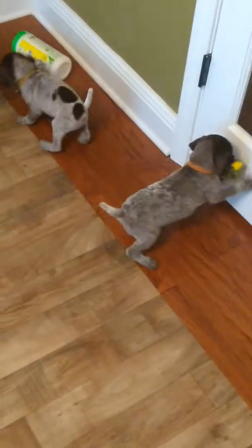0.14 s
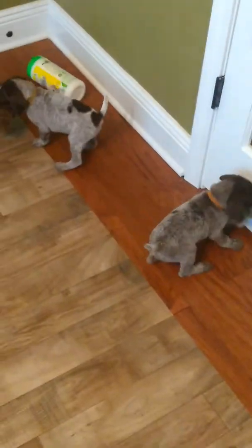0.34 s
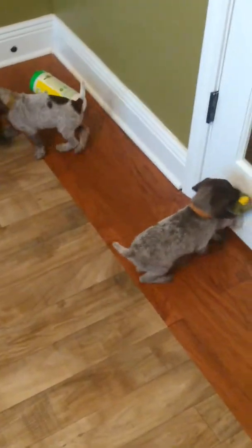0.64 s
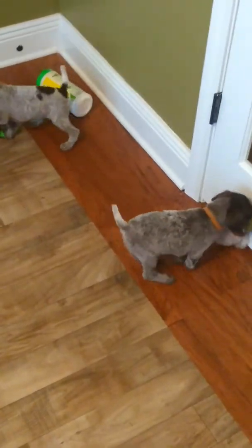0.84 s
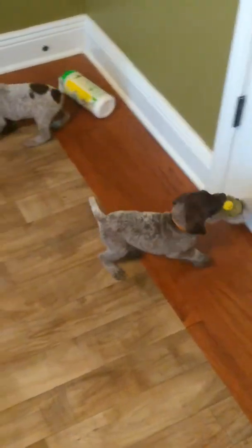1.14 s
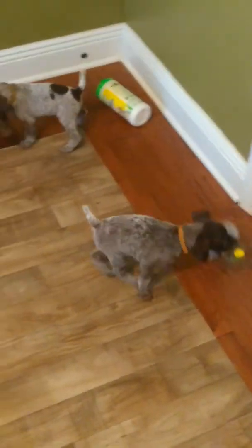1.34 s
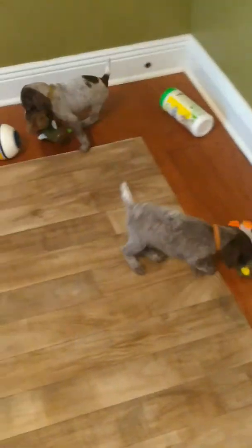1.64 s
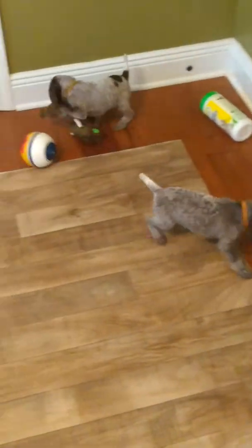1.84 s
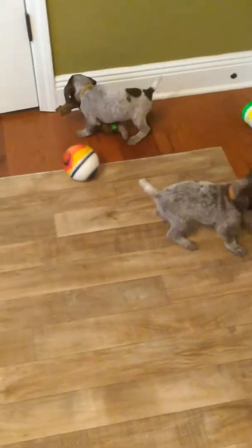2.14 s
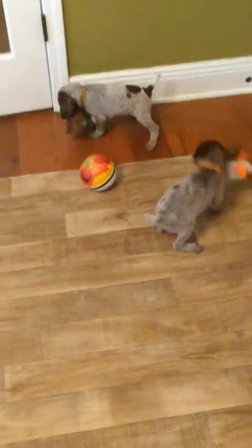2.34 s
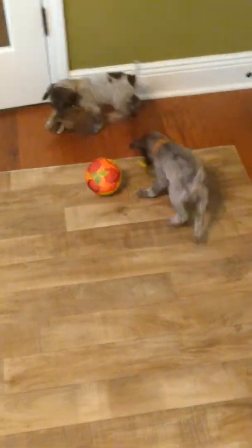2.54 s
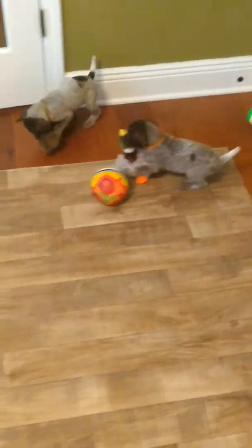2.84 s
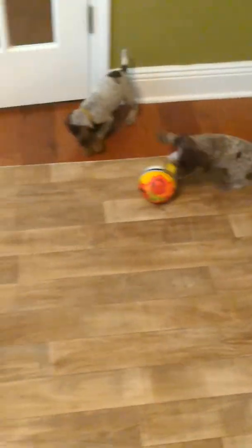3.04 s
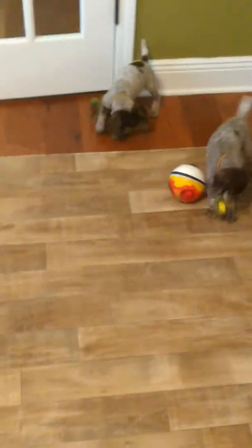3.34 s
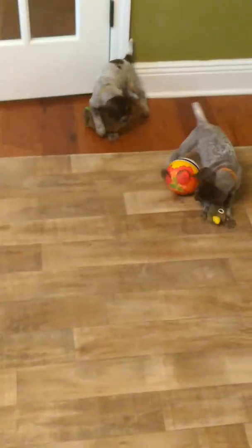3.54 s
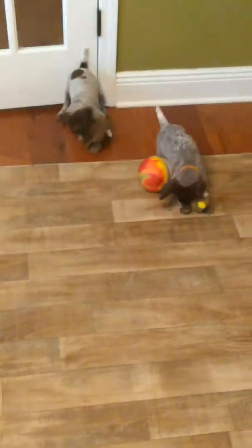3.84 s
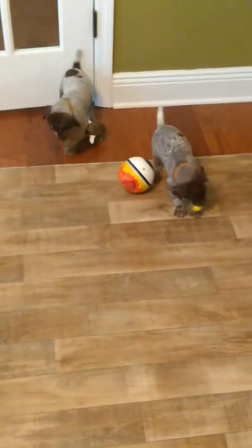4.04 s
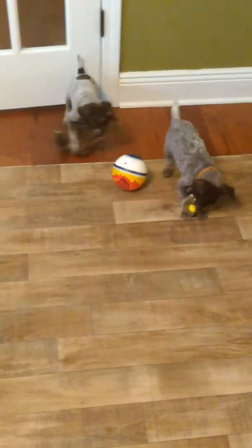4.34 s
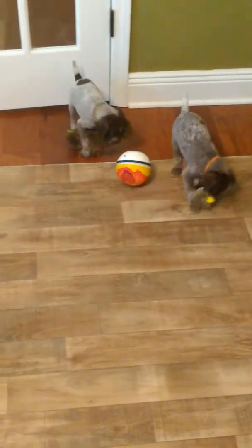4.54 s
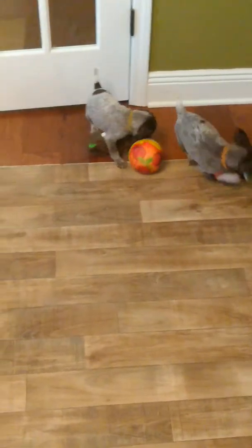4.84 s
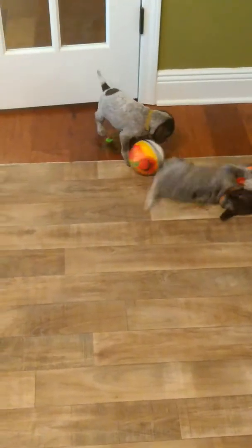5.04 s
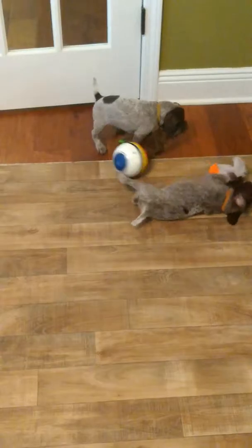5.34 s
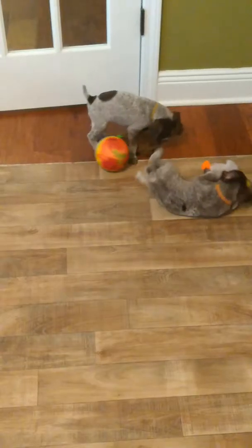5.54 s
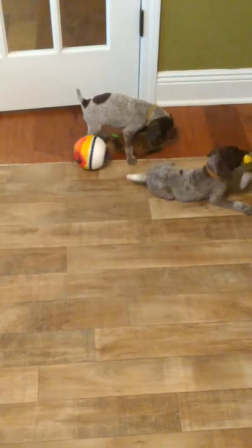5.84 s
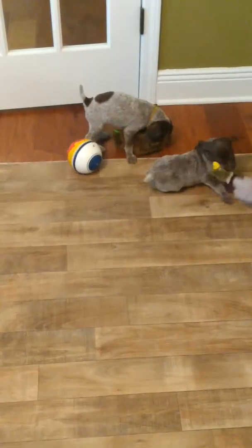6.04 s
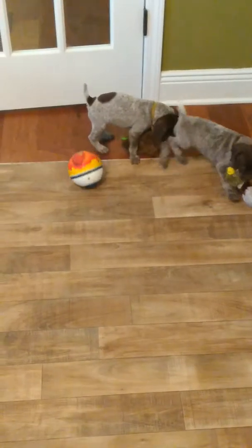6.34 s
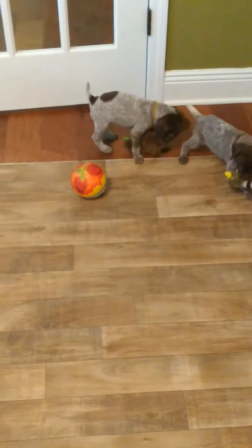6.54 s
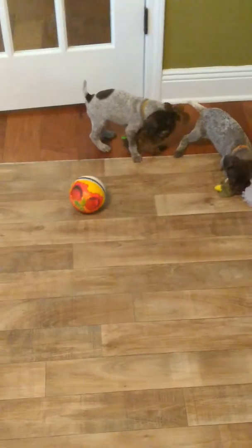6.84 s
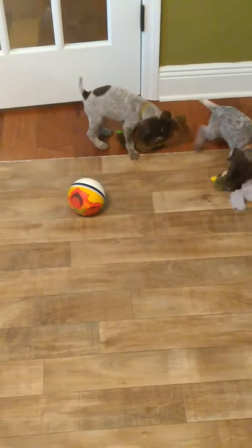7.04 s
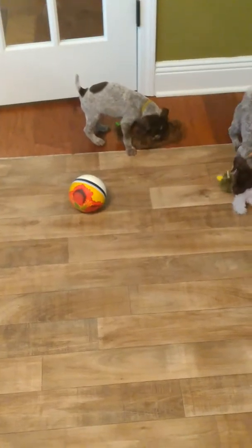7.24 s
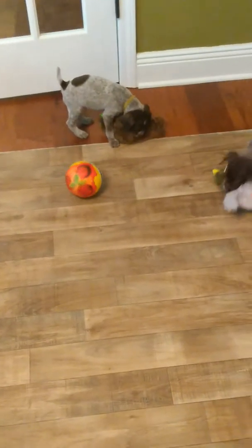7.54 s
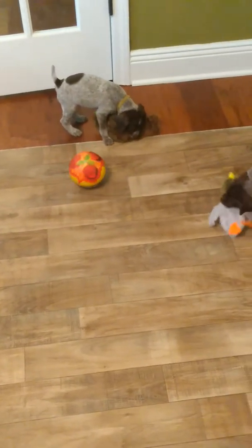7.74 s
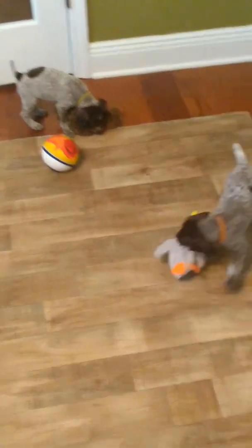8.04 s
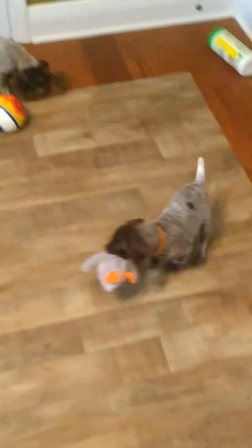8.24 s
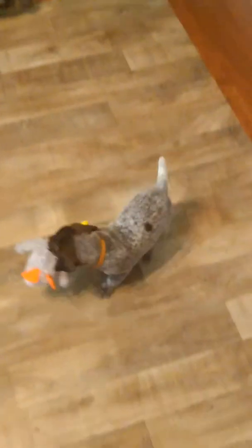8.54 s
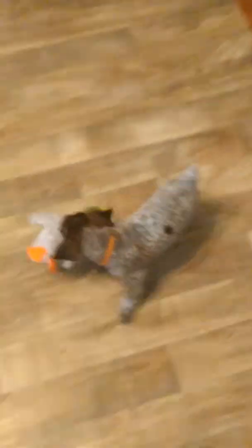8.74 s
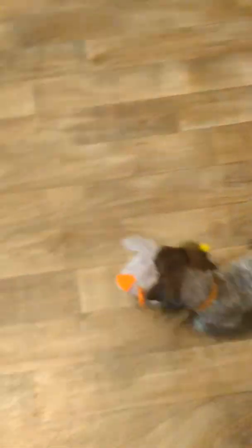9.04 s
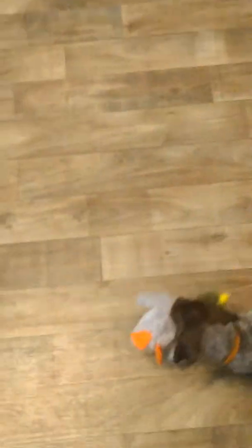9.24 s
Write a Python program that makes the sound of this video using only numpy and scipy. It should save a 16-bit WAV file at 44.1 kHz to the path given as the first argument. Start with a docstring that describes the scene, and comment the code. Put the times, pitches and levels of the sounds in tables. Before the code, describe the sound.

Puppies scamper over a hard floor in a bare, slightly echoing room. Claws click unevenly, paws thud lightly and fur and toys scuff along the boards. A small sharp snap comes near the start, and one louder knock lands about halfway. The patter thins briefly, then gets busy again. A faint ventilation hum runs underneath, all heard from a phone at standing height.

```python
"""Two puppies scamper with their toys over the hard floor of a bare room. From the start feet and fur
scuff, claws tick and pads thud on the boards over a ventilation hum; something small snaps at 0.3 s.
Landings crowd together at 2-3 s, lighten near 4 s, and the heaviest falls at 5.15 s. After a sparser
stretch the scamper is busy again from 7.4 s to the end at 9.4 s.
A phone with a front and a back microphone port listens from standing height."""
import sys
import numpy as np
from scipy import signal
from scipy.fft import rfft, irfft, next_fast_len
from scipy.io import wavfile

SR = 44100
rng = np.random.default_rng(int(sys.argv[2]) if len(sys.argv) > 2 else 0)


def int16_out(signal):
    """Quantize to a 16-bit WAV file."""
    q = np.round(np.clip(np.atleast_2d(signal).T, -1, 1) * 32767)
    wavfile.write(sys.argv[1], SR, q.astype(np.int16))


N = 414143
N_FFT = next_fast_len(N + SR)
BIN_HZ = np.maximum(np.arange(N_FFT // 2 + 1) * SR / N_FFT, 1)


def from_db(db):
    return 10 ** (np.asarray(db) / 20)


def unit_rms(x):
    return x / np.sqrt(np.mean(x ** 2) + 1e-20)


def at_hz(curve, hz):
    freq_hz, values = np.transpose(curve)
    return np.interp(np.log(hz), np.log(freq_hz), values)


def coloured(x, spectrum):
    """Noise shaped by a spectrum; rms 1."""
    shaped = rfft(x, N_FFT) * from_db(at_hz(spectrum, BIN_HZ))
    return unit_rms(irfft(shaped, N_FFT)[..., :N])


def ring(x, hz, t60_s):
    """Resonator: a unit click starts a decaying sine of height 1."""
    radius, angle = from_db(-60 / (t60_s * SR)), 2 * np.pi * hz / SR
    return signal.lfilter([0, np.sin(angle)], [1, -2 * radius * np.cos(angle), radius ** 2], x + 1e-18)


def highpass(x, hz):
    return signal.sosfilt(signal.butter(3, hz, "high", fs=SR, output="sos"), x)


def add(out, start_s, sound, peak_db):
    """Mix a sound into out at the given peak."""
    i = round(start_s * SR)
    out[i:i + len(sound)] += (from_db(peak_db) * sound / np.abs(sound).max())[:N - i]


# Floorboard modes: pitch_hz, gain_db, t60_s
BOARD_MODES = [(348, -25, 0.048), (436, -26, 0.046), (608, -8.5, 0.046), (790, -33, 0.057),
               (1250, -9, 0.0086)]
# Pads, toys and bodies landing: start_s, level_db, pitch_hz, slap_re_thud_db
LANDINGS = [(0.199, -38, 318, 7), (0.24, -37, 423, 0), (0.408, -29, 674, -11), (0.64, -36.5, 635, 0),
            (0.748, -34, 510, -12), (1.097, -31.5, 380, -31), (1.406, -41, 603, -9), (1.445, -50, 245, -19),
            (1.624, -35.5, 570, -15), (1.709, -40, 560, -14), (1.845, -35, 498, -17),
            (1.943, -32, 560, -4.5), (2.097, -29.5, 570, -7), (2.315, -27.5, 507, -4.5),
            (2.319, -39, 164, -20), (2.505, -45.5, 161, -38), (2.502, -33, 414, 2),
            (2.578, -34.5, 490, -20), (2.781, -34, 417, 3.5), (2.804, -31.5, 490, -3.5),
            (2.839, -34, 420, -3), (2.953, -27.5, 524, -4), (3.187, -40.5, 726, 2.5), (3.435, -37, 310, -2),
            (3.557, -28.5, 442, -9), (3.836, -43, 238, 3), (3.84, -48, 75, -25), (3.9, -40.5, 81, -25),
            (4.449, -48.5, 263, 5.5), (4.579, -50, 268, -18), (4.781, -49, 251, -14), (4.88, -36, 580, 4),
            (5.022, -33.5, 550, -9), (5.08, -39.5, 520, 8), (5.1518, -14, 412, -7.5),
            (5.883, -50.5, 198, -14), (6.029, -31.5, 383, -30), (6.362, -45.5, 510, -5),
            (6.43, -43, 430, -2), (6.469, -29, 490, -27), (7.192, -39, 427, -10), (7.508, -37, 378, -9),
            (7.604, -29.5, 400, -15), (7.839, -47, 264, -23), (7.929, -43.5, 260, -7),
            (8.004, -42, 310, -4), (8.189, -39.5, 460, -18), (8.281, -41, 251, -14), (8.31, -41, 581, -13),
            (8.401, -27, 497, -24), (8.649, -42, 390, -20), (8.762, -31, 434, 1), (8.975, -37.5, 385, -23),
            (9.313, -31, 360, -6.5)]


def thuds():
    """A soft push rings the pocket under the pad and the boards; a hard edge adds a slap."""
    contact_cycles, slap_decay_s = 1.71, 0.0027
    out, t = np.zeros(N), np.arange(6000) / SR
    noises = rng.standard_normal((len(LANDINGS), len(t)))
    spreads_db = rng.normal(0, 1.1, (len(LANDINGS), len(BOARD_MODES)))
    for (start_s, level_db, pitch_hz, slap_db), noise, spread_db in zip(LANDINGS, noises, spreads_db):
        contact = np.sin(np.pi * np.clip(t * pitch_hz / contact_cycles, 0, 1))  # sinks in, springs back
        push = contact * np.sin(2 * np.pi * pitch_hz * t)
        pocket = ring(push, pitch_hz, t60_s=9.4 / pitch_hz)
        boards = sum(from_db(gain_db + offset_db) * ring(push, hz, t60_s)
                     for (hz, gain_db, t60_s), offset_db in zip(BOARD_MODES, spread_db))
        thud = highpass(pocket + from_db(-7) * boards, 0.53 * pitch_hz)  # a small pad radiates little bass
        slap = ring(noise * np.exp(-t / slap_decay_s), hz=870, t60_s=0.0013)
        add(out, start_s, thud, level_db)
        add(out, start_s, slap, level_db + slap_db)
    return out


# Claws striking the floor: start_s, level_db, pitch_hz, crack_re_tick_db
CLAW_STRIKES = [(0.174, -29.5, 3350, -2), (0.2393, -33.5, 2830, 1), (0.301, -50, 2990, 15),
                (0.6434, -33, 3060, -8), (0.7486, -36, 1550, 5), (0.959, -40.5, 2680, -16),
                (1.0923, -29.5, 1980, -6), (1.2978, -30, 2940, 9), (1.3894, -29, 3300, 0.5),
                (1.4457, -32.5, 3000, -1.5), (1.5875, -35, 3050, 2), (1.68, -31.5, 3140, -3),
                (1.8361, -30.5, 3040, -1), (1.944, -31, 3400, -8), (2.095, -36.5, 2600, -10),
                (2.1143, -29, 2840, 1.5), (2.247, -35, 3020, -0.5), (2.317, -32, 3300, -3),
                (2.402, -42.5, 3500, -6), (2.5027, -38.5, 3260, 1), (2.576, -24, 3920, -4),
                (2.803, -29.5, 3060, -11), (2.9331, -31.5, 2930, -3), (2.9605, -25.5, 2440, -15),
                (3.1895, -39, 3290, -5), (3.225, -37, 3570, -7), (3.2583, -35, 3180, -3),
                (3.4087, -27.5, 3180, -2), (3.5803, -34, 2720, 1.5), (3.756, -35.5, 3530, -2),
                (3.871, -41, 3310, 0), (4.123, -33.5, 3080, 0), (4.5918, -39, 3100, -3),
                (4.6288, -40, 3120, -2), (4.803, -38.5, 2990, 4), (4.8783, -31.5, 3100, -9),
                (4.907, -33.5, 2900, 4.5), (5.0203, -29, 3020, 3.5), (5.1182, -29, 5000, 0),
                (5.1528, -50, 1610, -9), (5.217, -35.5, 3020, -9), (5.776, -32.5, 3530, -9),
                (5.7943, -47, 3000, 11), (6.0282, -30, 3380, -2), (6.4715, -26, 3040, -0.5),
                (6.4804, -30, 2920, 2), (6.6023, -35, 3200, 4), (7.1025, -41, 3630, -2),
                (7.1385, -33, 2900, -5), (7.416, -44, 2920, -5), (7.4424, -38, 3660, -10),
                (7.5073, -33.5, 2800, -5), (7.605, -32, 2670, -5), (7.734, -34.5, 3670, -11),
                (7.843, -39.5, 3430, 2), (7.9222, -35, 3920, -3), (7.98, -35.5, 3940, 0),
                (8.0668, -21, 3970, -8), (8.2393, -42, 5500, 6), (8.3084, -34, 3750, -4),
                (8.368, -37.5, 5320, 1), (8.3981, -37, 1530, -3), (8.4377, -31, 5600, 10.5),
                (8.6065, -40, 2860, 2), (8.685, -37, 3440, -5), (8.7619, -37.5, 3220, -2),
                (8.9537, -33.5, 3600, -7), (9.002, -28.5, 3850, -7), (9.1278, -31, 4020, 2),
                (9.2223, -37.5, 3470, -1)]


def claws():
    """A claw hits and skids: dying noise through the claw's ring, plus a short bright crack."""
    skid_decay_s, crack_decay_s = 0.0097, 0.0064
    out, t = np.zeros(N), np.arange(3000) / SR
    for start_s, level_db, pitch_hz, crack_db in CLAW_STRIKES:
        skid = rng.standard_normal(len(t)) * np.exp(-t / skid_decay_s)
        crack = rng.standard_normal(len(t)) * np.exp(-t / crack_decay_s)
        add(out, start_s, ring(skid, pitch_hz, t60_s=5.03 / pitch_hz), level_db)
        add(out, start_s, highpass(crack, hz=6040), level_db + crack_db)
    return out


# Small things snapping near the phone: start_s, level_db, pitch_hz, t60_s
NEAR_SNAPS = [(0.298, -16.5, 11500, 0.0027), (0.7493, -27.5, 11400, 0.007), (1.093, -31, 1770, 0.048),
              (2.9343, -29.5, 3050, 0.018), (6.229, -29, 576, 0.014), (6.482, -28, 3010, 0.027),
              (7.7333, -36.5, 3900, .012), (7.921, -33, 4240, 0.013), (9.2245, -32, 10300, .006)]


def snaps():
    """A brief crackle of contact starts one short ring."""
    contact_decay_s = 0.00089
    out, t = np.zeros(N), np.arange(2000) / SR
    for start_s, level_db, pitch_hz, t60_s in NEAR_SNAPS:
        crackle = rng.standard_normal(len(t)) * np.exp(-t / contact_decay_s)
        add(out, start_s, ring(crackle, pitch_hz, t60_s), level_db)
    return out


# Feet and toys sliding: peak_s, length_s, level_db, sparkle_re_scuff_db
FLOOR_SLIDES = [(0.015, .16, -57.5, 7.5), (0.255, 0.15, -51, 2), (0.606, 0.29, -64, 7.5),
                (0.775, 0.22, -54, -5), (0.857, 0.027, -47.5, 8), (1.117, 0.071, -49, -4),
                (1.342, 0.059, -42, -7), (1.414, 0.11, -62, 11), (1.73, 0.19, -46.5, -2.5),
                (1.875, 0.2, -55.5, -2), (2.448, 0.32, -54.5, 0.5), (2.79, 0.6, -58, -1),
                (2.96, 0.1, -69, 10), (3.275, 0.15, -52, 3), (3.42, 0.13, -50, -3.5),
                (3.61, 0.23, -56.5, 1), (3.883, 0.27, -53, 5), (4.133, 0.19, -49, -5), (4.65, 0.65, -63, 1),
                (4.88, 0.36, -52, -0.5), (5.085, 0.4, -52.5, -5), (5.3, 0.9, -73.5, 9),
                (5.833, 0.3, -61, 0), (6.057, .12, -68, -1), (6.492, 0.077, -48, 6),
                (6.605, 0.24, -57.5, -11), (7.136, 0.27, -50, -0.5), (7.49, 0.36, -55, -12),
                (7.58, 0.071, -52.5, 0), (8.098, 0.35, -71, -9), (8.31, 0.55, -64, -4),
                (8.441, 0.055, -36, -12), (8.804, 0.16, -64, 4), (8.959, 0.092, -48, -0.5),
                (9.098, 0.29, -51.5, -4), (9.328, 0.13, -54.5, 2)]
# Restless feet between the bigger moves: time_s, level_db
TREAD_LEVELS = [(0, -47.5), (.3, -67.5), (.6, -79), (1.0, -63), (1.4, -56), (2.2, -54.5), (2.8, -57.5),
                (3.5, -52.5), (3.9, -60), (4.6, -61.5), (5.1, -55.5), (5.5, -61), (6.0, -65), (6.6, -55.5),
                (7.1, -80.5), (7.6, -60), (8.5, -58), (9.39, -59)]


def scuffle_envelopes():
    """Scuff, sparkle and tread gains: steady bustle, swelling slides, a shuffle after each landing."""
    rub_re_tread_db, rise_share = -8.5, 0.41
    shuffle_re_thud_db, shuffle_decay_s = -27, 0.051
    t = np.arange(N) / SR
    tread = from_db(np.interp(t, *np.transpose(TREAD_LEVELS)))
    scuff = from_db(rub_re_tread_db) * tread
    sparkle = scuff.copy()
    for peak_s, length_s, level_db, sparkle_db in FLOOR_SLIDES:
        start_s = peak_s - rise_share * length_s
        swell = from_db(level_db) * np.interp(t, [start_s, peak_s, start_s + length_s], [0, 1, 0]) ** 2
        scuff += swell
        sparkle += from_db(sparkle_db) * swell
    shuffle = np.exp(-t[:SR // 2] / shuffle_decay_s)
    for start_s, level_db, *_ in LANDINGS:
        add(tread, start_s, shuffle, level_db + shuffle_re_thud_db)
    return scuff, sparkle, tread


# Friction spectrum of fur and pads: freq_hz, gain_db
SCUFF_SPECTRUM = [(900, -10.5), (1500, -3.5), (3000, 6.5), (4500, 9), (7000, -1.5), (9000, -14)]


def scuffle():
    """Dense uneven grains of friction; the sparser tread of small feet shakes the boards."""
    grains_per_s = np.array([[2500], [2500], [120]])
    size_db = 2.84 * np.minimum(rng.exponential(1, (3, N)), 5)
    signs = rng.choice([-1, 1], (3, N))
    hits = rng.random((3, N)) < grains_per_s / SR
    scuff_grains, sparkle_grains, steps = from_db(size_db) * signs * hits
    scuff = coloured(scuff_grains, SCUFF_SPECTRUM)
    sparkle = unit_rms(highpass(sparkle_grains, hz=7340))
    boards = sum(from_db(0.47 * gain_db) * ring(steps, hz, 0.21 * t60_s)  # flatter, shorter than in a thud
                 for hz, gain_db, t60_s in BOARD_MODES)
    scuff_gain, sparkle_gain, tread_gain = scuffle_envelopes()
    return scuff_gain * scuff + sparkle_gain * sparkle + tread_gain * unit_rms(boards)


# Reverberation of the bare room: freq_hz, t60_s
ROOM_DECAY = [(100, 0.11), (300, 0.39), (1000, 0.57), (3000, 0.67), (8000, 0.66), (15000, 0.067)]


def room(x):
    """Reflections: noise that swells in after the first walls answer and dies by band; one per port."""
    first_wall_s, rise_s, early_decay_s = 0.003, 0.0032, 0.0082
    t = np.arange(SR * 3 // 4) / SR
    edges_hz = 60 * 2 ** np.arange(0, 8.6, 0.5)
    white, tail = rng.standard_normal((2, 2, len(t))), 0
    for k, (low_hz, top_hz) in enumerate(zip(edges_hz, edges_hz[1:])):
        bandpass = signal.butter(2, [low_hz, top_hz], "band", fs=SR, output="sos")
        t60_s = at_hz(ROOM_DECAY, np.sqrt(low_hz * top_hz))
        tail += signal.sosfilt(bandpass, white[k % 2]) * from_db(-60 * t / t60_s)
    tail *= np.clip((t - first_wall_s) / rise_s, 0, 1)
    tail *= 1 + 1.11 * np.exp(-t / early_decay_s)
    tail /= np.sqrt(np.sum(tail ** 2, axis=1, keepdims=True))
    return irfft(rfft(x, N_FFT) * rfft(tail, N_FFT), N_FFT)[:, :N]


# Ventilation air spectrum: freq_hz, gain_db
AIR_SPECTRUM = [(15, -40), (35, -30), (53, -40), (101, -11.5), (260, 1), (826, -11), (1800, -12),
                (2170, -16), (2420, -5), (3000, -14), (4380, -28), (5580, -22.5), (6730, -58), (7910, -30),
                (15500, -30)]
# Ventilation tones: pitch_hz, width_hz, level_db
HUM_TONES = [(54.7, 12, -66), (103.1, 7.9, -58), (115.8, 10, -70), (256.8, 5.5, -57.5), (818, 12, -69)]


def ventilation():
    """Steady air noise with a few wavering tones, unrelated at the two ports."""
    air_db = -54
    out = from_db(air_db) * coloured(rng.standard_normal((2, N)), AIR_SPECTRUM)
    for pitch_hz, width_hz, level_db in HUM_TONES:
        t60_s = np.log(1000) / (np.pi * width_hz)
        out += from_db(level_db) * unit_rms(ring(rng.standard_normal((2, N)), pitch_hz, t60_s))
    return out


def scene():
    """Sound at the front and back ports; the snaps are too near to wake the room."""
    back_direct_db, room_db, claw_send_db, thud_send_db = -5, 3, -3.5, 1
    ticks, landings, feet = claws(), thuds(), scuffle()
    direct = (ticks + landings + feet + snaps()) * from_db([[0], [back_direct_db]])
    send = feet + from_db(claw_send_db) * ticks + from_db(thud_send_db) * landings
    return direct + from_db(room_db) * room(send) + ventilation()


# Back port response: freq_hz, gain_re_front_db
BACK_RESPONSE = [(300, 0), (1600, -5), (6000, -5), (10000, -6), (15000, -1)]
# Left channel response: freq_hz, gain_re_right_db
LEFT_RESPONSE = [(60, -18), (120, 8.5), (240, -1.5), (480, 0), (950, -1.5), (1890, -1.5), (3770, -2.5),
                 (7520, -3), (15000, -8)]


def record(dry):
    """Each channel is one port minus the other port delayed; the bass is left unsteered."""
    steer_from_hz, right_steer_to_hz, delay_s = 680, 7650, 19.85 / SR
    bass_likeness, bass_phase_rad = 0.62, 0.95
    stopband_hz, left_dc = 16377, 0.00765
    front, back = rfft(dry, N_FFT)
    back *= from_db(at_hz(BACK_RESPONSE, BIN_HZ))
    steer = 1 / (1 + (steer_from_hz / BIN_HZ) ** 8)
    alike = bass_likeness * (1 - steer)  # long waves reach both ports nearly alike
    back = alike * front * np.exp(1j * bass_phase_rad) + np.sqrt(1 - alike ** 2) * back
    delay = steer * np.exp(-2j * np.pi * BIN_HZ * delay_s)
    left = (back - delay * front) * from_db(at_hz(LEFT_RESPONSE, BIN_HZ))
    right = front - delay * back / (1 + (BIN_HZ / right_steer_to_hz) ** 2)
    stereo = irfft(np.array([left, right]), N_FFT)[:, :N]
    lowpass = signal.cheby2(16, 70, stopband_hz, fs=SR, output="sos")
    return signal.sosfilt(lowpass, stereo) + [[left_dc], [0]]


dry = scene()
out = record(dry)
int16_out(out)
```